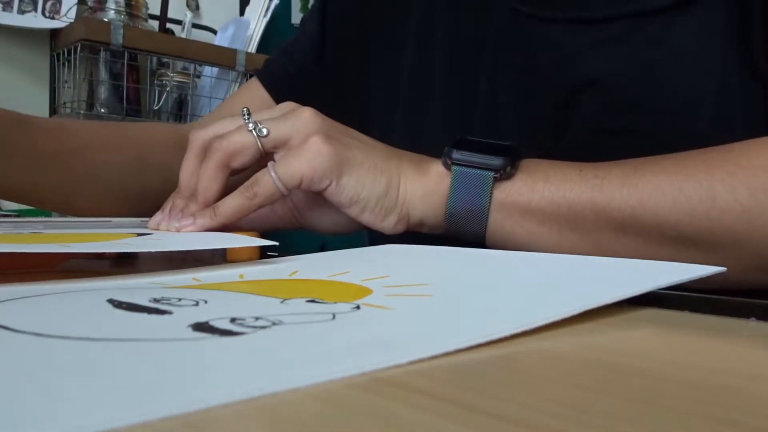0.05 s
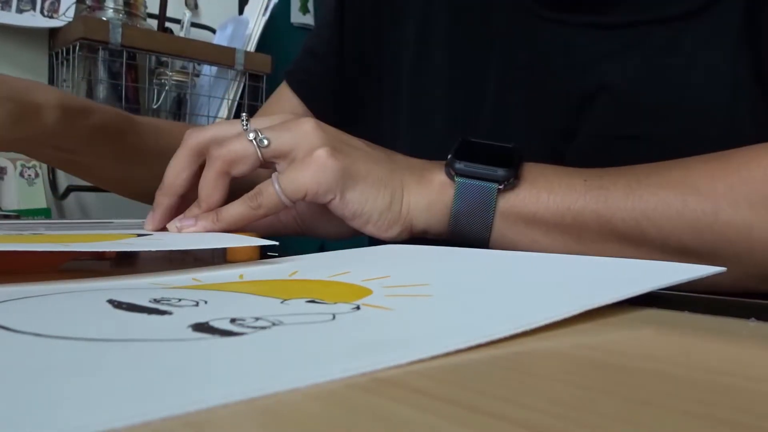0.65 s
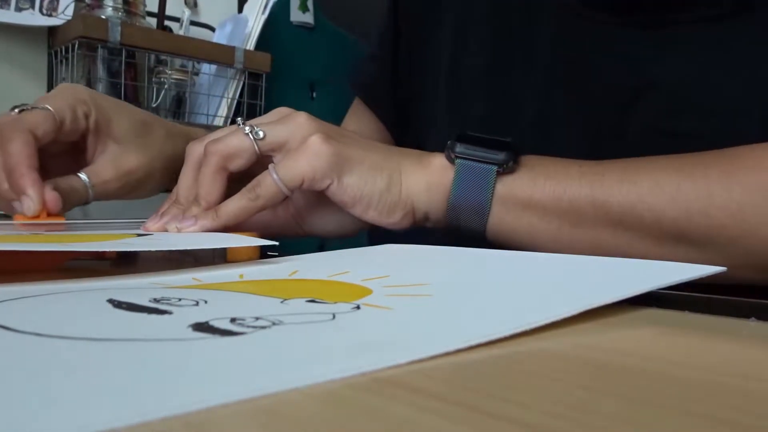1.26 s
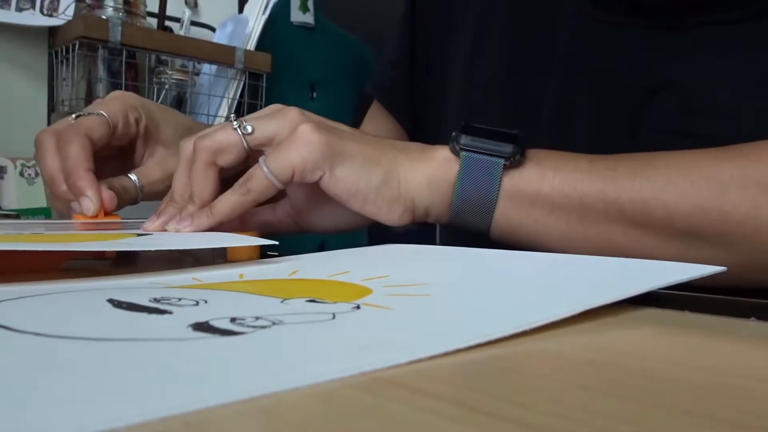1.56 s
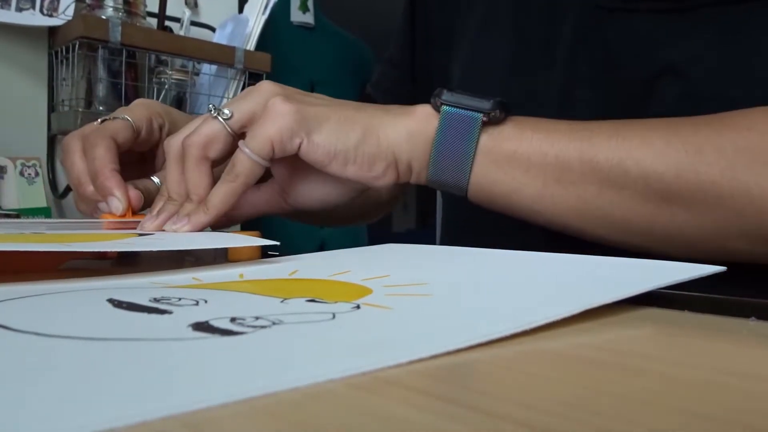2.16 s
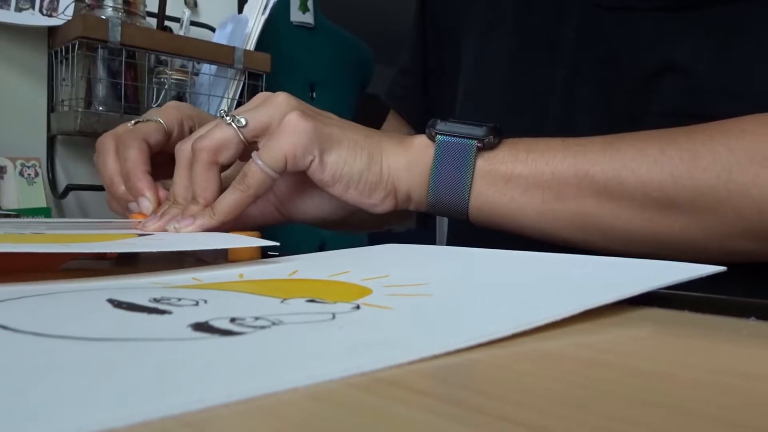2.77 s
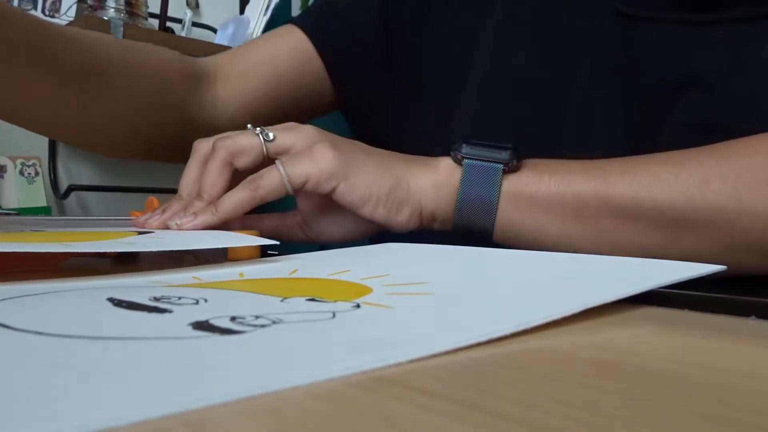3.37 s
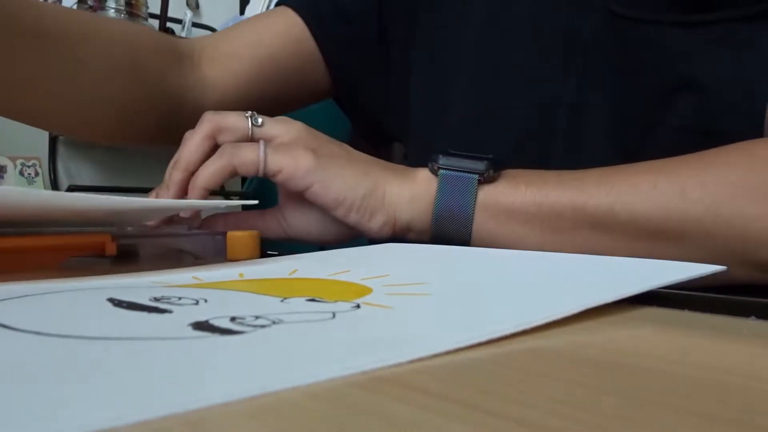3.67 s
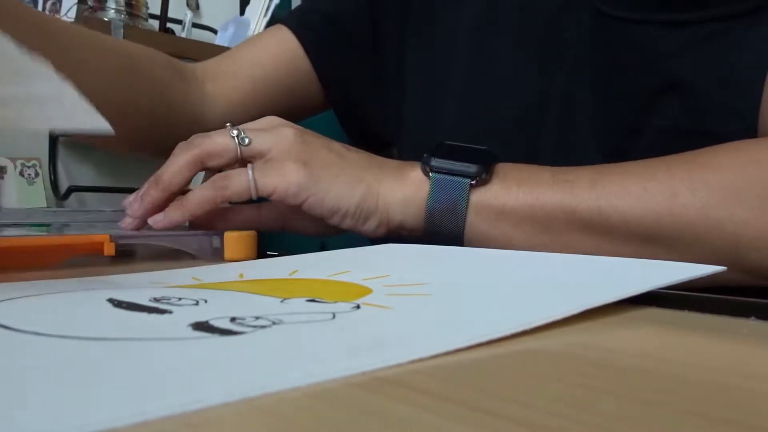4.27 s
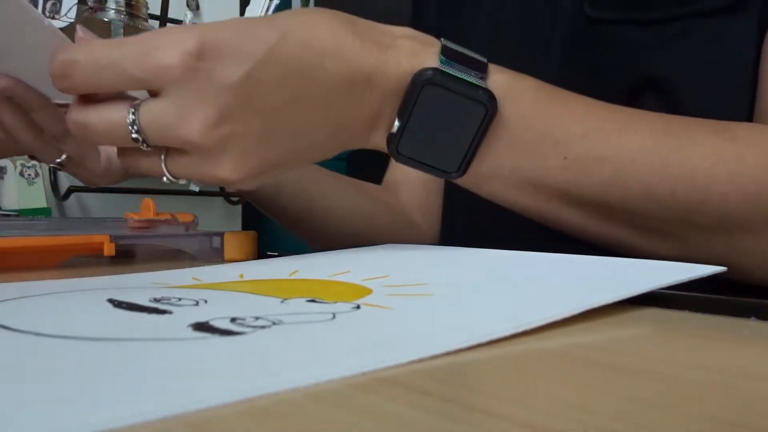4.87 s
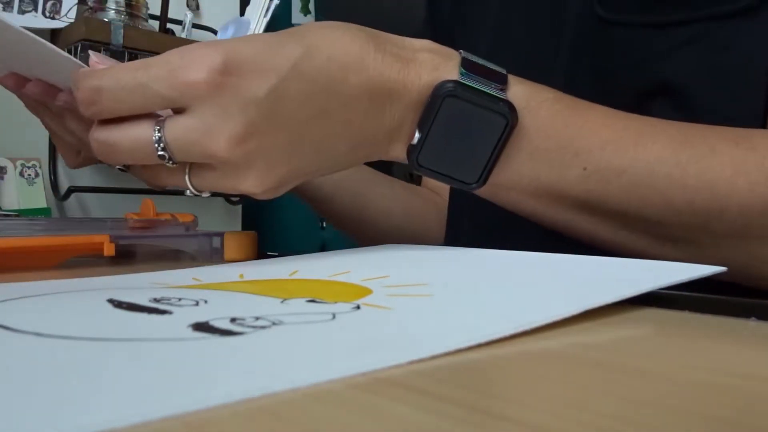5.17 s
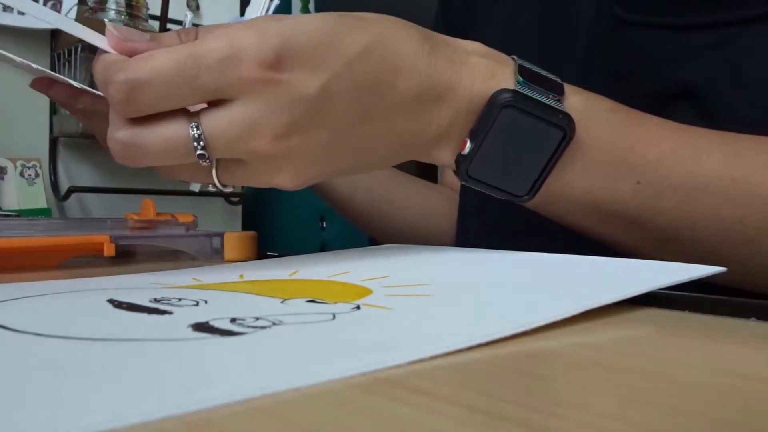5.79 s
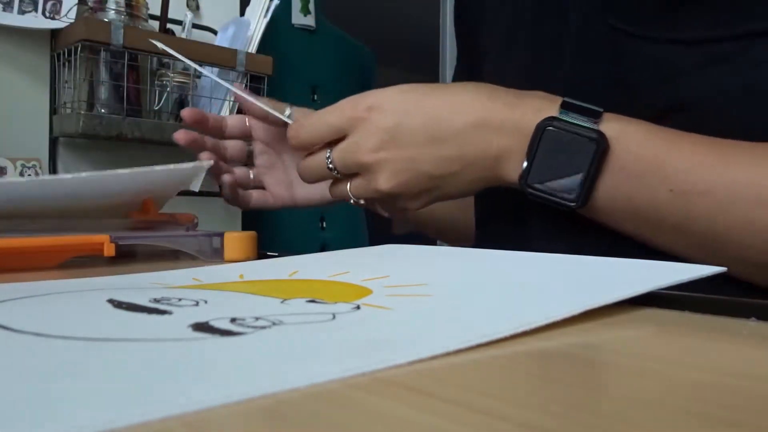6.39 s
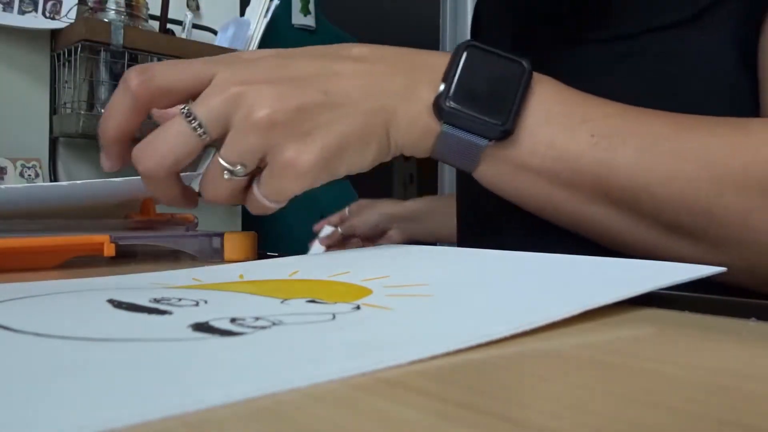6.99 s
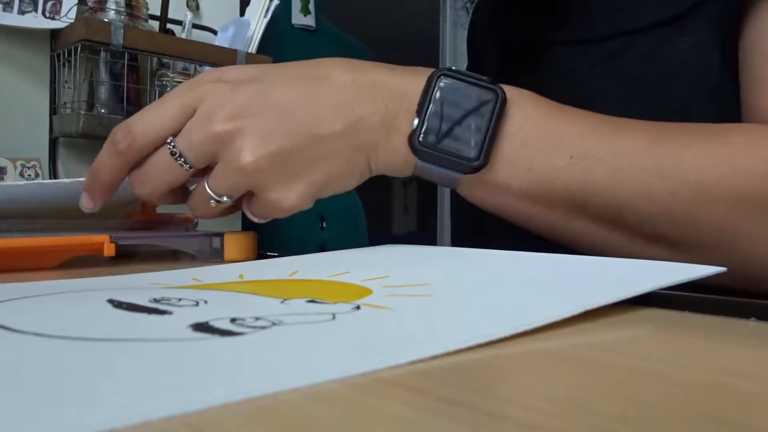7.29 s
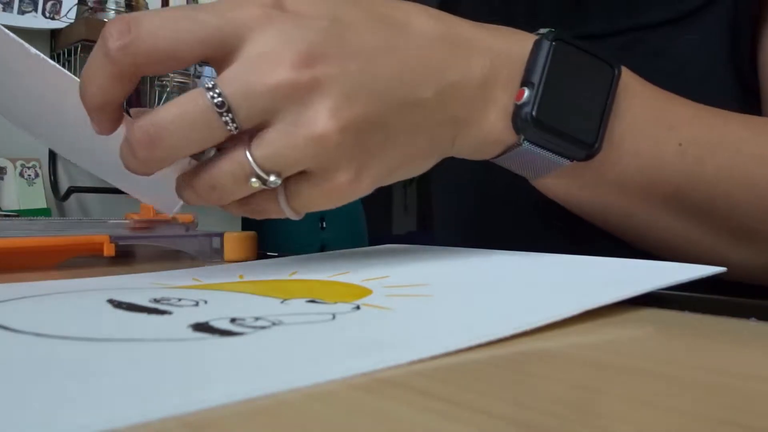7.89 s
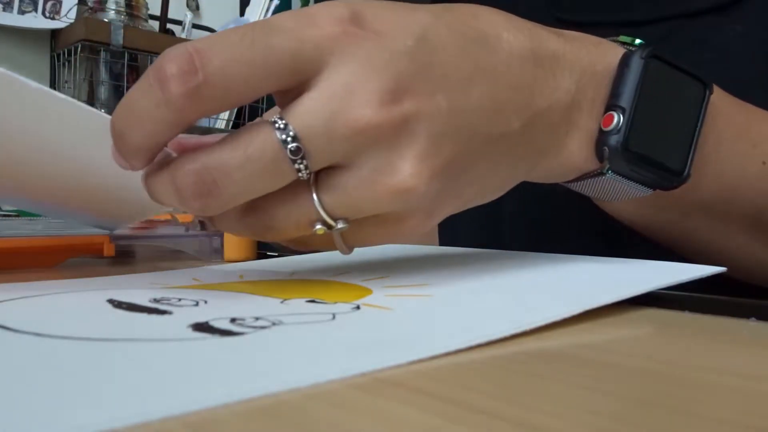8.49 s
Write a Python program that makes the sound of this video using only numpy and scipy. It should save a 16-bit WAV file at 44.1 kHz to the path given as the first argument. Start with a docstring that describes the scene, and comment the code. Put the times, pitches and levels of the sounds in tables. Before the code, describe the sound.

A plastic paper trimmer slides through heavy paper with a rubbing hiss and stops with a sharp click. After another short push and two more clicks, the sheet is drawn out with a rustle and thin scrapes. The rail claps shut with a brief rattle. Paper then drops with fluttering taps and is softly picked up again. It sounds close, on a wooden table in a small room with a steady rush of air.

```python
"""A paper trimmer cuts heavy paper on a wooden table in a small room. Stick-slip friction makes its
plastic slider rub and its blade hiss; the slider clicks at its stop and shakes the loose rail.
The sheet is drawn out with a rustle and thin scrapes, and the rail claps shut, chatters and rings
in its modes. A sheet drops on the trimmer with fluttering taps and is picked up again.
Moving air makes a soft, steady rush underneath."""
import sys
import numpy as np
from scipy import signal
from scipy.fft import rfft, irfft
from scipy.io import wavfile

SR = 44100
rng = np.random.default_rng(int(sys.argv[2]) if len(sys.argv) > 2 else 0)


def file_out(sig):
    """Save sig as 16-bit WAV at sys.argv[1]."""
    # one column per channel
    cols = np.atleast_2d(sig).T
    # limit, then scale
    lim = np.clip(cols, -1, 1)
    pcm = np.round(lim * 32767).astype(np.int16)
    wavfile.write(sys.argv[1], SR, pcm)


N = 381024
FREQS = np.fft.rfftfreq(4096, 1 / SR)
STROKE_DB = 20  # a stroke gains this much in its rise time and loses it in its fall time


def gain_of(db):
    """The decibel scale: 20 dB is a tenfold amplitude."""
    return np.exp(np.asarray(db) * (np.log(10) / 20))

def unit_rms(x):
    """Normalisation to a mean power of one."""
    return x / np.sqrt(np.mean(x ** 2) + 1e-20)

def curve_at(points, hz):
    """Interpolation of a table on a logarithmic frequency axis."""
    f, value = np.transpose(points)
    return np.interp(np.log(hz + 1), np.log(f + 1), value)

def tilted(points, slope_db):
    """Spectral tilt: slope_db per octave above the bass."""
    return curve_at(points, FREQS) + slope_db * np.log2(1 + FREQS / 500)

def add(mix, s, sound):
    """Superposition: a sound joins the mix at time s."""
    part = mix[round(s * SR):][:len(sound)]
    part += sound[:len(part)]

def colour(x, db):
    """Minimum-phase filtering at unit energy; db gives the spectral shape on FREQS."""
    cepstrum = irfft(np.log(gain_of(db)))
    half = len(cepstrum) // 2
    cepstrum[1:half] *= 2
    cepstrum[half + 1:] = 0
    taps = irfft(np.exp(rfft(cepstrum)))[:half]
    return signal.oaconvolve(x, taps / np.linalg.norm(taps))[:len(x)]

def waver(rate_hz, depth_db):
    """Random amplitude modulation: a gain that changes rate_hz times a second."""
    steps = rng.standard_normal(N // 20)
    return gain_of(depth_db * np.interp(np.arange(N) / SR * rate_hz, np.arange(len(steps)), steps))

def stroke(s, rise_s, hold_s, fall_s, db):
    """Exponential growth and decay: a hand gathers speed up to time s, holds it and slows."""
    t = np.arange(N) / SR - s
    away = np.maximum(-t / max(rise_s, .002), (t - hold_s) / max(fall_s, .002))
    return gain_of(db - STROKE_DB * np.clip(away, 0, 6))

def friction(slips_per_s, spread_db, smooth, judder_db):
    """Stick-slip friction: tiny uneven slips over a smooth rub, under a juddering contact pressure."""
    slips = (rng.random(N) < slips_per_s / SR) * rng.choice([-1, 1], N)
    sizes = gain_of(spread_db * np.minimum(rng.exponential(1, N), 4))
    rub = unit_rms(slips * sizes) + smooth * rng.standard_normal(N)
    return unit_rms(rub * waver(110, judder_db))

def impact(t60, crack, rise_s=0.00022, signs=None):
    """Impulse response: a crack, then dense, quickly damped modes; a slow contact loses its crack."""
    signs = rng.choice([-1., 1.], SR // 2) if signs is None else signs
    t = np.arange(len(signs)) / SR
    build = 1 - np.exp(-(t + 1 / SR) / rise_s)
    modes = signs * build * gain_of(-60 * t / max(t60, .003))
    modes /= np.linalg.norm(modes)
    modes[0] += crack * np.exp(-rise_s / 0.0014)
    return modes / np.linalg.norm(modes)

def rattle(hold_s, gap_s, fade_db_per_s, t60, crack, rise_s):
    """Repeated impact: unevenly spaced contacts stay about equally strong for hold_s, then die away."""
    out = np.zeros(SR)
    gaps = gap_s * rng.uniform(.6, 1.4, 40)
    times = np.cumsum(gaps) - gaps[0]
    levels = 1.5 * rng.standard_normal(len(times)) - fade_db_per_s * np.maximum(times - hold_s, 0)
    noises = rng.choice([-1., 1.], (len(times), SR // 8))
    for s, db, signs in zip(times, levels, noises):
        if db > -40:
            add(out, s, gain_of(db) * impact(t60, crack, rise_s, signs))
    return out / np.linalg.norm(out)

# Likeness of diffuse sound at two microphones. Each row: frequency in Hz, coherence.
COHERENCE = [(60, 0.76), (300, 1), (700, 0.9), (1400, 0.55), (3000, 0.48), (6000, 0.087), (11000, 0.2)]
def diffuse(pair):
    """Spatial coherence: sound from all around is more alike at two nearby points in the bass."""
    a, b = rfft(pair)
    hz = np.fft.rfftfreq(pair.shape[1], 1 / SR)
    coherence = np.clip(curve_at(COHERENCE, hz), -.99, .99)
    mid, side = a * np.sqrt((1 + coherence) / 2), b * np.sqrt((1 - coherence) / 2)
    return irfft(np.array([mid + side, mid - side]), pair.shape[1])

# The room's reverberation. Each row: frequency in Hz, time to fall 60 dB in seconds.
ROOM_T60 = [(200, 0.48), (550, 0.56), (1400, 0.33), (3700, 0.37), (10000, 0.36)]
def room(x, wet_db, near_db=-4, lead_s=.00006, left_db=2.0):
    """Reverberation: direct sound from the left, early reflections off table and shelves, a tail."""
    size = SR // 2
    t, bins = np.arange(size) / SR, np.fft.rfftfreq(size, 1 / SR)
    hz, when, spectra = signal.stft(rng.standard_normal((2, size)), SR, nperseg=256)
    decay = gain_of(-60 * when / curve_at(ROOM_T60, hz)[:, None])
    tail = signal.istft(spectra * decay, SR, nperseg=256)[1][:, :size]
    tail *= np.clip((t - .004) / 0.0013, 0, 1)
    near = rng.standard_normal((2, size)) * (t > .0006) * np.exp(-t / 0.0045)
    reflections = gain_of(wet_db) * unit_rms(tail) + gain_of(near_db) * unit_rms(near)
    response = diffuse(reflections) / np.sqrt(size)
    # the housing shades the right microphone, but bass diffracts around it
    shade_db = left_db * curve_at([(300, 0), (1300, 1), (3000, 0.93), (9000, 0.99)], bins)
    delay_s = 8 / SR + np.array([[0], [lead_s]])
    direct = gain_of([shade_db, -shade_db]) * np.exp(-2j * np.pi * bins * delay_s)
    response[:, :128] += irfft(direct, size)[:, :128]
    response /= np.sqrt(np.sum(response ** 2) / 2)
    response *= np.clip((t[-1] - t) / .05, 0, 1)
    return signal.oaconvolve(x[None], response, axes=1)[:, :N]

# Spectrum of the room's air. Each row: frequency in Hz, relative level in dB.
AIR_SPECTRUM = [(25, -48), (45, -39), (70, -27.5), (105, -31), (140, -24.5), (165, -17.5), (230, -13),
                (300, -3), (365, 1), (480, -1.5), (700, -0.5), (1300, -11), (3600, -14), (6500, -21),
                (11000, -29.5)]
def room_air():
    """Broadband flow noise: moving air fills the room with a soft, diffuse rush."""
    air = np.array([colour(noise, curve_at(AIR_SPECTRUM, FREQS)) for noise in rng.standard_normal((2, N))])
    return gain_of(-46) * diffuse(air) * waver(rate_hz=9.1, depth_db=0.31)

# Paper edges and fingers tapping. Each row: start in seconds, relative level in dB,
# tilt in dB per octave, time the flutter holds in seconds.
TAPS = [(0.0228, -38.5, -9, 0), (0.0766, -38, -10.5, 0), (0.214, -39, -13, 0.0017),
        (2.2664, -39.5, 8, 0.0093), (2.825, -36.5, -1, 0), (3.4426, -35, -0.5, 0.013),
        (3.871, -37, -15, 0.017), (4.187, -31.5, 8, 0), (4.753, -33, 8, 0.0071), (5.402, -29.5, 8, 0.024),
        (6.2616, -20, 1.5, 0.0083), (6.286, -21, 3.5, 0.0038), (6.3369, -22.5, 3.5, 0),
        (6.377, -25.5, -0.5, 0.0026), (6.395, -31, -2, .015), (6.55, -34, 0, 0.0036),
        (6.6108, -29.5, -1, 0.00068), (6.6502, -34.5, 1.5, 0.021), (7.2111, -37, -2, 0.0091),
        (7.255, -37, -5.5, 0.01), (7.6643, -36.5, 4, 0.0045), (7.7637, -39.5, -3, 0.0034),
        (7.933, -39.5, -4.5, 0.0096), (8.0556, -40.5, 3, 0.0038)]
# Spectrum of a tap. Each row: frequency in Hz, relative level in dB.
TAP_SPECTRUM = [(30, -58), (200, -19.5), (450, -3.5), (1000, 0.5), (1700, 5), (2500, 4), (3500, -2.5),
                (5000, -9), (8000, -16), (11000, -29)]
def paper_taps():
    """Heavily damped impact: stiff paper knocks, flutters briefly and does not ring."""
    out = np.zeros(N)
    for s, db, slope_db, flutter_s in TAPS:
        contacts = rattle(flutter_s, gap_s=.009, fade_db_per_s=1200, t60=.03, crack=.53, rise_s=.00032)
        tap = colour(contacts, tilted(TAP_SPECTRUM, slope_db))
        add(out, s, gain_of(db) * tap / np.linalg.norm(tap))
    return gain_of(26.5) * out

# Sheets sliding. Each row: time of reaching full speed, rise, hold and fall in seconds,
# relative level in dB, tilt in dB per octave.
SLIDES = [(0.198, 0.26, 0.44, .1, -45.5, -3), (2.81, 0.072, 0.022, .15, -46.5, -1),
          (2.95, .13, .05, 0.55, -42.5, -8), (3.45, 0.44, 0.021, .1, -42.5, -0.5),
          (3.69, 0.15, 0.0017, .08, -26, 7.5), (3.79, .1, 0.074, 0.27, -40, 11.5),
          (4.111, 0.17, 0.065, 0.026, -37.5, -1.5), (5.2, 0.11, 0.012, .16, -46, -4.5),
          (5.43, 0.084, 0, .08, -40, 2), (6.277, 0.017, 0.16, 0.34, -37, -6.5),
          (6.75, .1, 0.21, 0.22, -51.5, 3), (7.644, 0.63, 0.027, .05, -42, -1),
          (7.766, .04, 0.14, 0.11, -43, -2)]
# Spectrum of sliding paper. Each row: frequency in Hz, relative level in dB.
PAPER_SPECTRUM = [(30, -53), (150, -22.5), (500, -4.5), (1200, 1), (2000, 5), (3000, 1), (4200, -0.5),
                  (5800, -3.5), (7200, -8.5), (9200, -13.5), (11000, -24)]
def sliding_sheets():
    """Stick-slip friction: paper fibres catch and let go; each stroke has its own brightness."""
    out, slips = np.zeros(N), friction(1400, spread_db=3.6, smooth=0.66, judder_db=1.9)
    for s, rise_s, hold_s, fall_s, db, slope_db in SLIDES:
        gain = stroke(s, rise_s, hold_s, fall_s, db)
        moving = np.flatnonzero(gain > gain_of(db - 2 * STROKE_DB))
        out[moving] += colour(slips[moving], tilted(PAPER_SPECTRUM, slope_db)) * gain[moving]
    return gain_of(-1.5) * out

# Plastic parts knocking. Each row: start in seconds, relative level in dB, tilt in dB per octave,
# table thump relative to the click in dB, rise of the contact in seconds.
KNOCKS = [(0.504, -29, -3.5, -15, 0.0061), (1.6316, -29.5, -3.5, -30, 0.00026),
          (1.655, -27.5, -5, -30, 0.00036), (1.7335, -23.5, -5.5, -27, 0.0011),
          (1.862, -25, -4, -24, 0.0018), (1.9256, -35.5, 6, -40, .0003), (1.9555, -8.5, 1.5, -43, 0.000088),
          (2.0713, -26, -9, -37, 0.003), (2.421, -28, -5.5, -25, .0024), (2.526, -26.5, -4.5, -30, .0016),
          (2.639, -21, -3, -28, .0005), (2.6615, -11, 1.5, -19.5, 0.00026), (2.9674, -15, 0, -46, 0.0011),
          (3.3037, -28, 0, -13, 0.0005), (3.3287, -24.5, -4, -8.5, 0.00045)]
# Spectrum of struck plastic. Each row: frequency in Hz, relative level in dB.
PLASTIC_SPECTRUM = [(30, -81), (200, -32.5), (450, -17.5), (800, -1), (1100, -1.5), (1700, 3), (2600, -1.5),
                    (3800, -1.5), (5000, -7), (8000, -11.5), (11000, -30)]
def plastic_knocks():
    """Structure-borne sound: clicks thump the table, and the hardest rattle and ring the loose rail."""
    out = np.zeros(N)
    loose_db = -16  # knocks above this shake the rail
    table_db = curve_at([(25, -1), (70, -8.5), (150, -4.5), (300, 7), (600, 4.5), (2000, -67)], FREQS)
    for s, db, slope_db, thump_db, rise_s in KNOCKS:
        plastic_db = tilted(PLASTIC_SPECTRUM, slope_db)
        click = colour(impact(t60=0.026, crack=0.51, rise_s=rise_s), plastic_db)
        thump = gain_of(thump_db) * colour(impact(t60=0.074, crack=0.64), table_db)
        add(out, s, gain_of(db) * (click / np.linalg.norm(click) + thump))
        if db > loose_db:
            shake = rattle(hold_s=.0072, gap_s=.006, fade_db_per_s=308, t60=.027, crack=.47, rise_s=.0006)
            shake_db = -32 + 2.23 * (db - loose_db)
            add(out, s + .009, gain_of(shake_db) * colour(shake, plastic_db))
            out += gain_of(db - 53) * rail_ring(s)
    return gain_of(25.5) * out

# Pushes of the slider. Each row: time of reaching full speed, rise, hold and fall in seconds,
# relative level in dB.
PUSHES = [(0.649, 0.017, .075, 0.12, -36.5), (0.74, 0.085, 0.65, 0.19, -30.5),
          (1.544, 0.087, 0.044, .07, -42), (1.691, 0.095, 0.044, 0.097, -36),
          (1.815, .05, 0.0029, 0.12, -44.5), (1.951, 0.078, 0.14, 0.018, -44.5), (2.435, .06, .06, .1, -49),
          (2.568, 0.073, .015, .1, -34.5)]
# Spectra of the rub, the blade's hiss and the blade's rumble. Each row: frequency in Hz, relative level in dB.
RUB_SPECTRUM = [(40, -65), (300, -34.5), (600, -12), (950, -7), (1400, 1.5), (1900, 1), (2400, 0.5),
                (3000, -17), (3700, -12.5), (4400, -23), (5500, -17.5), (11000, -27.5)]
HISS_SPECTRUM = [(40, -67), (800, -60), (2000, 4), (3000, 4), (3900, 4), (4600, -0.5), (6300, -2),
                 (7000, -7.5), (9000, -6), (11000, -17)]
RUMBLE_SPECTRUM = [(25, -42), (50, -39), (75, -33), (110, -25.5), (160, -18.5), (230, -12), (320, -6.5),
                   (430, -3.5), (580, -3.5), (760, -17), (950, -1.5), (1500, -23)]
# Resonances and dips of the slider and hollow base. Each row: centre in Hz, width in Hz, lift in dB.
BODY_RESONANCES = [(298, 110, 5.5), (588, 110, 8), (698, 102, 13), (1100, 30, -2.5), (1120, 280, 2.5),
                   (1373, 52, -22.5), (1446, 150, 7.5), (1720, 90, -0.5), (2100, 100, 0.5),
                   (2230, 140, -3.5)]
# Strength of the rub along the rail. Each row: fraction of the way, gain in dB.
RUB_ALONG_RAIL = [(0.25, 0.5), (0.47, 8.5), (1, 6.5)]
def slider():
    """Friction noise grows with speed: the slider rubs, and the blade parts fibres with a hiss and a low
    rumble."""
    speed = np.max([stroke(*push) for push in PUSHES], axis=0)
    way = np.cumsum(speed) / np.sum(speed)
    body_db = sum(db / (1 + (2 * (FREQS - hz) / width) ** 2) for hz, width, db in BODY_RESONANCES)
    rub = colour(friction(1500, 2.8, 1.0, 2.1), curve_at(RUB_SPECTRUM, FREQS) + body_db)
    rub *= gain_of(np.interp(way, *np.transpose(RUB_ALONG_RAIL)))
    hiss = colour(friction(3000, 3.1, 0.98, 0.72), curve_at(HISS_SPECTRUM, FREQS))
    hiss *= gain_of(-8.5 - 5 * way)
    rumble = colour(friction(800, 3.7, 0.54, 1.7), curve_at(RUMBLE_SPECTRUM, FREQS) + body_db)
    return (rub + gain_of(-1) * rumble) * speed + hiss * speed ** 0.74

# Five places along the rail. Each entry: time the slider passes in seconds.
PASSING_S = [0.7, 0.95, 1.2, 1.45, 1.75]
def along_rail(x):
    """Interference: each place has its own reflections, so the timbre shifts as the slider moves."""
    t = np.arange(N) / SR
    crossfades = [np.sqrt(np.interp(t, PASSING_S, share)) for share in np.eye(len(PASSING_S))]
    return sum(room(x * fade, wet_db=-2, near_db=-1) for fade in crossfades)

# Edges and fingertips scraping. Each row: time of reaching full speed, rise, hold and fall in seconds,
# level in dB, pitch in Hz, glide in octaves per second, bandwidth in Hz.
SCRAPES = [(1.536, .05, 0.21, .06, -37.5, 1680, -1, 746), (1.546, .05, 0.23, 0.065, -47, 3540, 0, 500),
           (3.081, 0.19, 0.067, .24, -42, 4780, 0, 473), (3.147, 0.37, 0.013, .33, -39.5, 3780, 0, 800),
           (3.65, 0.045, 0.057, .1, -38.5, 2700, 0, 990), (3.722, .02, 0, .12, -32.5, 2140, 7.5, 850),
           (4.66, 0.14, .008, .02, -44.5, 4780, -0.5, 420), (6.105, .05, 0.08, .15, -54, 4600, 0, 1300),
           (7.551, .25, 0.14, .05, -49.5, 5050, -1, 1500), (7.601, 0.18, 0.065, .04, -42.5, 2100, 0, 850),
           (7.673, .4, 0.024, .03, -57, 9200, 0, 296), (7.895, .035, 0, .05, -58, 9240, 0, 300),
           (8.52, .05, 0.0063, 0.11, -49, 3660, 3, 1300)]
def edge_scrapes():
    """Friction-driven resonance: each rubbed edge whistles in a band that may glide as it is drawn."""
    out, slips = np.zeros(N), friction(1100, spread_db=3, smooth=0.6, judder_db=3)
    for s, rise_s, hold_s, fall_s, db, hz, glide, width_hz in SCRAPES:
        gain = stroke(s, rise_s, hold_s, fall_s, db)
        moving = np.flatnonzero(gain > gain_of(db - 2 * STROKE_DB))
        pitch_hz = hz * 2 ** (glide * (moving / SR - s))
        carrier = np.exp(2j * np.pi * np.cumsum(pitch_hz) / SR)
        pole = np.exp(-np.pi * width_hz / SR)
        # shift down, low-pass, shift back: a resonance that follows the pitch
        edge = carrier * signal.lfilter([1], np.poly([pole, pole]), slips[moving] / carrier)
        out[moving] += unit_rms(edge.real) * gain[moving]
    return out

# Modes of the rail. Each row: frequency in Hz, relative level in dB, time to fall 60 dB in seconds.
RAIL_MODES = [(785, -10, .3), (858, 2, .4), (917, -6, .25), (968, -2, .27), (1445, -9, .24),
              (1625, -2, .27), (1675, -5, .2), (1990, -5, .3), (2226, -9, .14), (2686, -7, .22),
              (3550, -9, .2), (4054, -10, .22), (4188, -9, .24), (8250, -17, .15)]
def rail_ring(s):
    """Free vibration: struck at time s, the rail rings as a sum of damped sinusoids."""
    t = np.arange(SR // 2) / SR
    out = np.zeros(N)
    ring = sum(gain_of(db - 60 * t / t60) * np.sin(2 * np.pi * (hz * t + rng.random()))
               for hz, db, t60 in RAIL_MODES)
    add(out, s, ring * (1 - np.exp(-t / 0.0011)))
    return out

# Spectrum of the rail landing. Each row: frequency in Hz, relative level in dB.
CLAP_SPECTRUM = [(30, -43), (130, -33), (300, -15), (550, -6.5), (740, -6), (890, 2.5), (1150, -4),
                 (1700, -0.5), (3000, -3), (4000, -0.5), (5000, -8), (5900, -11), (8500, -13.5),
                 (11000, -22)]
def rail_clap(s):
    """Rebound: the long rail falls shut at time s and chatters against the base."""
    out = np.zeros(N)
    chatter = rattle(hold_s=.031, gap_s=.005, fade_db_per_s=235, t60=.041, crack=.51, rise_s=.0008)
    add(out, s, colour(chatter, curve_at(CLAP_SPECTRUM, FREQS)))
    return gain_of(21.5) * out

def scene():
    """Superposition of trimmer, paper and air in the room; knocks and taps are close and dry."""
    shut_s = 4.3688
    knocks = room(plastic_knocks(), wet_db=-8, near_db=-10, lead_s=.00007)
    taps = room(paper_taps(), wet_db=-7, near_db=-10, left_db=2.2)
    clap = room(rail_clap(shut_s), wet_db=-6.5, near_db=-0.5)
    ring = room(gain_of(-25) * rail_ring(shut_s), wet_db=-26, near_db=-20, left_db=1.3)
    sheets = room(sliding_sheets(), wet_db=-3)
    scrapes = room(edge_scrapes(), wet_db=-1, near_db=5.5, left_db=5.5)
    cut = along_rail(slider())
    return room_air() + taps + sheets + knocks + cut + scrapes + ring + clap

def record(dry, low_cut_hz=48, high_cut_hz=11150):
    """Clipping and band limiting: peaks stop at full scale, then deep bass and top treble are cut."""
    highpass = signal.butter(2, low_cut_hz, "highpass", fs=SR, output="sos")
    lowpass = signal.firwin(401, high_cut_hz, window=("kaiser", 8), fs=SR)
    x = signal.sosfilt(highpass, np.clip(dry, -1, 1))
    return signal.oaconvolve(x, lowpass[None], "same")


dry = scene()
out = record(dry)
file_out(out)
```